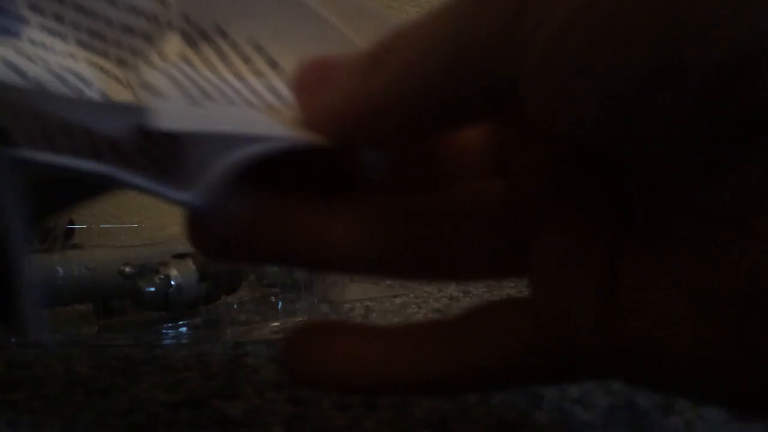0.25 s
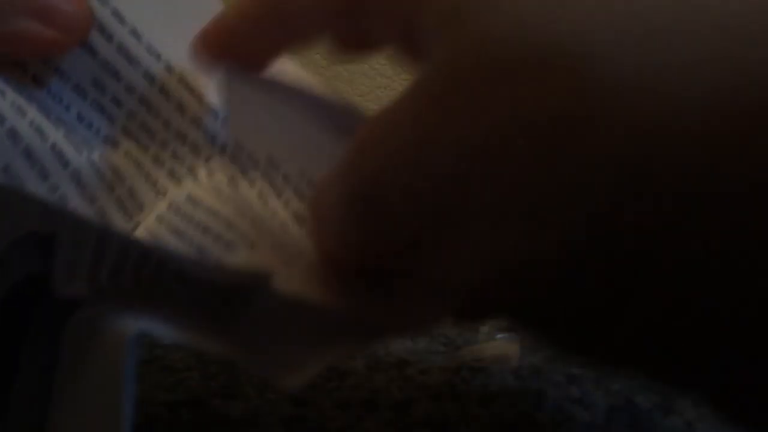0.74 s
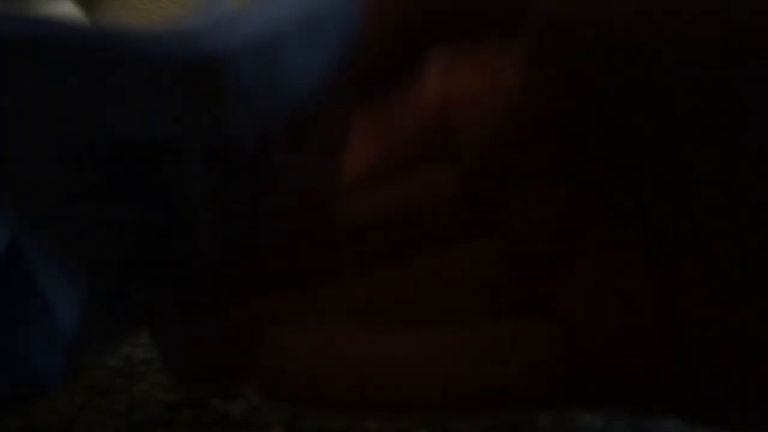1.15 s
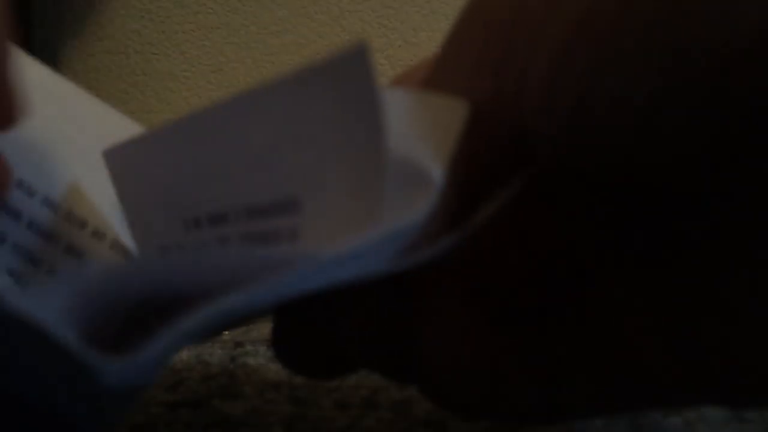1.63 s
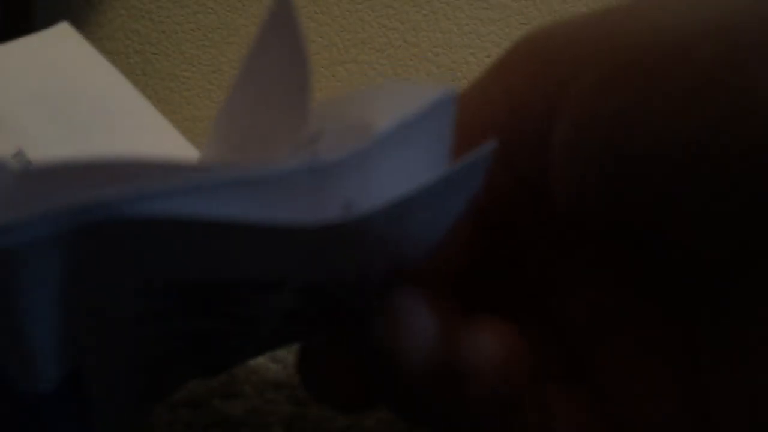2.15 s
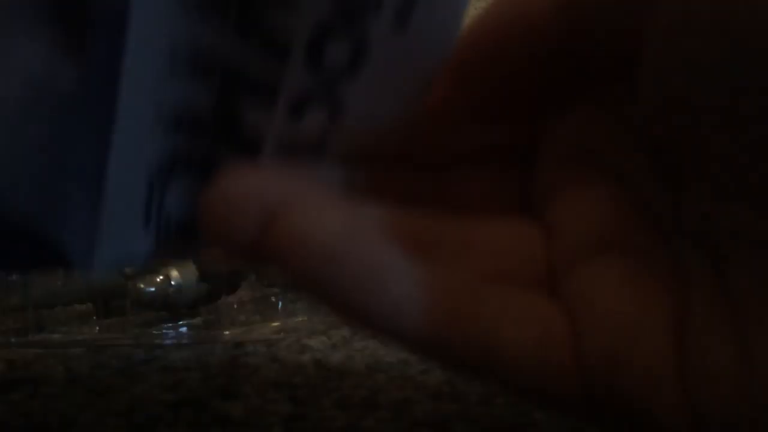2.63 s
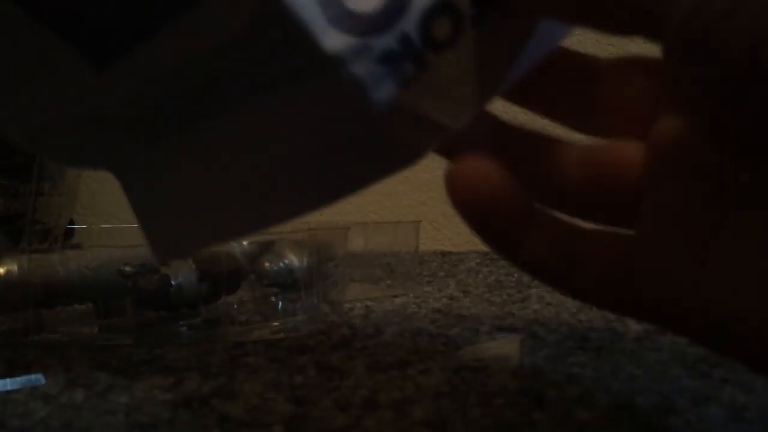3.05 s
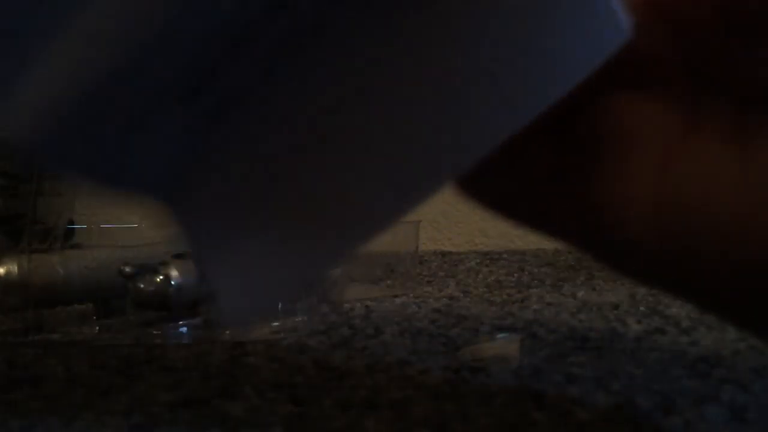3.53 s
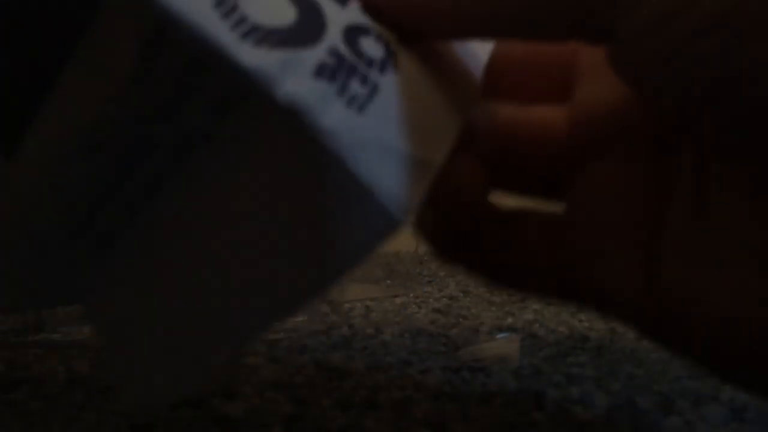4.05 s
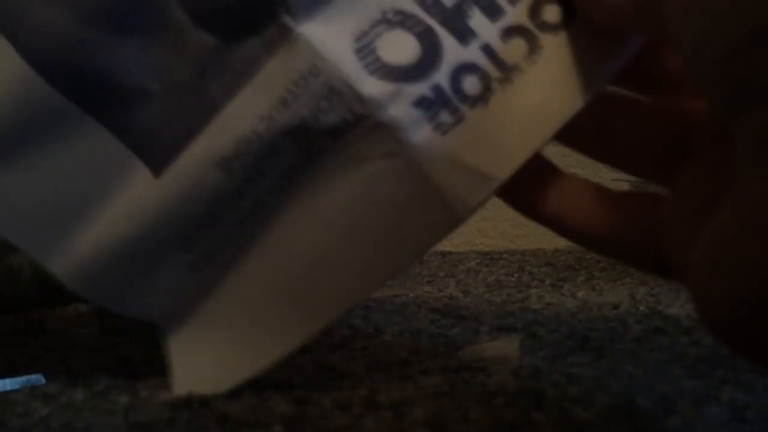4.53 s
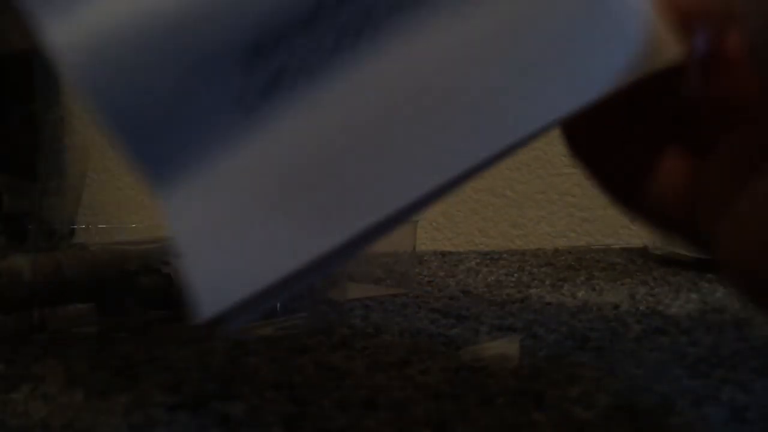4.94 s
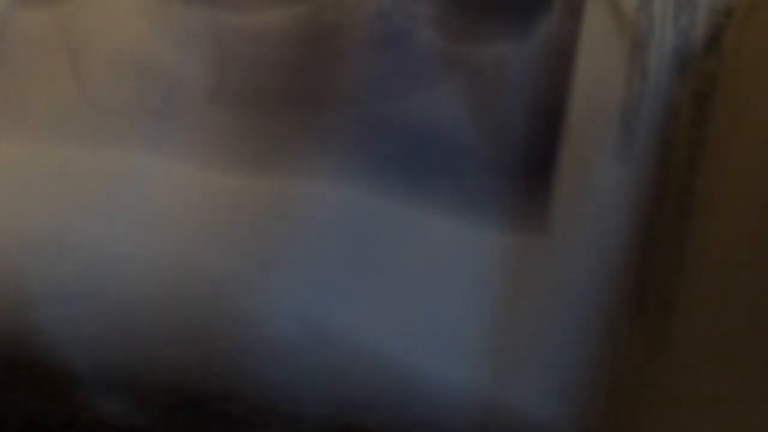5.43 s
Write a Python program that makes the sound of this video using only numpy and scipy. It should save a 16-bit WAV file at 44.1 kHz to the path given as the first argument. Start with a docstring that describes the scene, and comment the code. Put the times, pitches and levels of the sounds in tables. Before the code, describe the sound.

Close, dry rustle of stiff paper sheets sliding and flexing in a small quiet room, punctuated by irregular snaps and low flapping thumps.

```python
"""Paper leaflets opened by hand

Folded leaflets are pulled from a plastic tray and opened out, close to the microphone in a small room.
Friction: sheet slides on sheet, a grainy hiss of catching fibres over the lower crinkle of flexing paper.
Buckling: creases give way in sharp treble cracks, each of which makes the panel around it pop and ring.
Moving air: the sheets push soft, low puffs at the microphone. A short reverberation and a faint room tone
lie beneath.
"""
import sys
import numpy as np
from scipy import signal
from scipy.io import wavfile

SR = 44100
rng = np.random.default_rng(int(sys.argv[2]) if len(sys.argv) > 2 else 0)


def dump(signal):
    """Clip the signal to [-1, 1] and save it as 16-bit WAV at the path in sys.argv[1]."""
    limited = np.clip(np.atleast_2d(signal).T, -1, 1)
    pcm = np.round(limited * 32767).astype(np.int16)
    wavfile.write(sys.argv[1], SR, pcm)


N = 250488
TIME = np.arange(N) / SR   # s


def from_db(db):
    """Level: decibels become an amplitude gain."""
    return 10 ** (np.asarray(db) / 20)


def rms_one(x):
    """Normalisation: scale to unit power."""
    return x / np.sqrt(np.mean(x ** 2) + 1e-20)


def in_time(rows):
    """Interpolation: the columns of a curve, sample by sample."""
    s, *columns = np.transpose(rows)
    return [np.interp(TIME, s, column) for column in columns]


def add(track, s, sound):
    """Superposition: lay a sound into a track at a time."""
    start = int(np.clip(round(s * SR), 0, N - 1))
    track[start:start + len(sound)] += sound[:N - start]


def butter(x, hz, kind, order=2):
    """Filtering: causal low-, high- or band-pass."""
    sections = signal.butter(order, np.clip(hz, 10, .45 * SR), kind, fs=SR, output="sos")
    return signal.sosfilt(sections, x)


def mode_filter(hz, width_hz):
    """Damped oscillation: coefficients of one mode, gain 1 on top."""
    r = np.exp(-np.pi * width_hz / SR)
    zeros = np.array([1, 0, -1]) * (1 - r * r) / 2
    poles = [1, -2 * r * np.cos(2 * np.pi * hz / SR), r * r]
    return zeros, poles


def resonance(x, hz, width_hz):
    """Resonance: one damped mode of fixed pitch."""
    zeros, poles = mode_filter(hz, width_hz)
    return signal.lfilter(zeros, poles, x)


def moving_resonance(x, hz, quality, size=512):
    """Gliding resonance: a mode whose centre moves block by block."""
    out, state = np.zeros(N), np.zeros(2)
    for i in range(0, N, size):
        zeros, poles = mode_filter(hz[i], hz[i] / quality)
        out[i:i + size], state = signal.lfilter(zeros, poles, x[i:i + size], zi=state)
    return out


def bounce(x, lag_s, share):
    """Comb filtering: add the reflection from a surface about a hand's breadth away."""
    i = np.arange(len(x))
    delayed = np.clip(i - np.round(lag_s * SR).astype(int), 0, len(x) - 1)
    return x + share * x[delayed]


def drift(rate_hz):
    """Random modulation: slow chance with spread 1, computed on every 40th sample."""
    r = np.exp(-80 * np.pi * rate_hz / SR)
    noise = rng.standard_normal(N // 40 + 2002)
    slow = signal.lfilter([1], [1, -2 * r, r * r], noise)[2000:]   # past the filter's start
    return np.interp(np.arange(N) / 40, np.arange(len(slow)), rms_one(slow))


def coloured(sources, spectrum, patchy_db, tilt_db=0):
    """Spectral shaping: half-octave bands dealt in turn to two excitations, each wavering; rms 1."""
    points_hz, points_db = np.transpose(spectrum)
    edges = 22 * 2 ** np.arange(0, 9.6, .5)
    out = np.zeros(N)
    for k, (low, high) in enumerate(zip(edges, edges[1:])):
        if high > points_hz[0] and low < points_hz[-1]:
            hz = np.sqrt(low * high)
            level_db = np.interp(np.log(hz), np.log(points_hz), points_db)
            level_db = level_db + tilt_db * np.log2(hz / 6000)   # tilt per octave
            band = butter(sources[k % 2], [low, high], "band")
            out += from_db(level_db + patchy_db * drift(7.8)) * band
    return rms_one(out)


# Spectrum of the quiet room. Each row: frequency in Hz, relative density in dB per Hz.
ROOM_TONE_SPECTRUM = [(25, -8), (60, 66), (150, 13), (400, -17), (1000, -14), (2500, -71), (6000, -73),
                      (15000, -29)]
ROOM_TONE_DB = -61.5


def room_tone():
    """Stationary noise: a steady, faint background of fixed spectrum."""
    noise = rng.standard_normal((2, N))
    return from_db(ROOM_TONE_DB) * coloured(noise, ROOM_TONE_SPECTRUM, patchy_db=0)


ROOM_T60_S, ROOM_DB, WALL_CUT_HZ = 0.23, -22.5, 6200


def room(x):
    """Reverberation: ten feedback delays between near walls, which dull the sound."""
    out = np.zeros(N)
    lags = (rng.uniform(.009, .04, 10) * SR).astype(int)
    for k, lag in enumerate(lags):
        loop, gain = x.copy(), from_db(-60 * lag / SR / ROOM_T60_S)
        for i in range(lag, N, lag):
            loop[i:i + lag] += gain * loop[i - lag:i][:N - i]
        out += (loop - x) * (-1) ** k   # echoes only
    for lag in (53, 127, 211):
        # clutter scatters each echo: all-pass filters
        taps = np.r_[.65, np.zeros(lag - 1), 1]
        out = signal.lfilter(taps, taps[::-1], out)
    return butter(out, WALL_CUT_HZ, "low", order=1) / np.sqrt(10)


# Hollow resonances of the corner between counter and wall.
# Each row: frequency in Hz, width in Hz, added share as a gain.
CORNER_MODES = [(422, 27, 0.13), (990, 54, 0.36), (2230, 8.5, 0.49)]


def corner(paper):
    """Cavity resonance: the corner reinforces a few pitches of the paper."""
    return paper + sum(share * resonance(paper, hz, width_hz) for hz, width_hz, share in CORNER_MODES)


# Strokes of the hand, each sliding one sheet over another.
# Each row: fastest moment in seconds, swell in seconds, fade in seconds, hiss drive in dB,
# flexing drive in dB, stirred air drive in dB, brightness of the hiss in dB per octave.
HAND_STROKES = [(0.028, 0.12, 0.03, -38.5, -35, -38, 0), (0.141, 0.041, 0.031, -38, -43, -63, 7),
                (0.28, 0.044, 0.076, -45, -48.5, -63, 3), (0.371, 0.03, 0.035, -37.5, -38.5, -53, 0),
                (0.437, 0.019, 0.018, -40.5, -39, -40, -1), (0.63, 0.045, 0.024, -42, -41, -61, -3),
                (0.699, 0.053, 0.037, -37.5, -46, -65, 7.5), (0.815, 0.013, .035, -53, -54, -51, 6),
                (0.886, 0.036, 0.028, -41, -44.5, -52, 5.5), (0.979, 0.041, 0.029, -31, -36.5, -47, 3.5),
                (1.119, 0.053, 0.031, -28, -36.5, -52, 1.5), (1.274, 0.07, 0.13, -37, -43.5, -60, 0.5),
                (1.42, .04, .11, -42.5, -49.5, -53.5, 5), (1.577, 0.039, 0.064, -32.5, -33, -41.5, -3),
                (1.661, 0.094, 0.067, -34, -56, -48.5, -2.5), (1.86, 0.074, .025, -44, -46.5, -42.5, 2),
                (1.912, 0.025, 0.042, -33.5, -38.5, -42, -1.5), (2.02, 0.064, .06, -46.5, -48, -48, 0.5),
                (2.125, 0.047, 0.039, -39.5, -56, -39, 0.5), (2.21, 0.053, 0.091, -44, -52, -43, 0.5),
                (2.305, .04, 0.048, -37.5, -41, -42, 1), (2.414, 0.025, 0.038, -43, -45, -39, -6),
                (2.514, 0.059, 0.095, -37, -49, -36, 0), (2.64, 0.015, 0.084, -34, -41.5, -41, -3.5),
                (2.76, 0.038, 0.02, -33.5, -34.5, -53, -4.5), (2.81, .03, 0.067, -53, -51, -50, -2),
                (2.925, 0.021, .045, -40, -43, -41, -2), (3.015, 0.042, 0.035, -34.5, -37.5, -40.5, 0),
                (3.189, 0.032, 0.074, -49, -43, -38, 2), (3.45, 0.091, 0.044, -50.5, -46.5, -51, 3),
                (3.521, .035, 0.094, -33, -44, -44.5, -1), (3.641, 0.038, 0.11, -44, -45, -46, -2.5),
                (3.866, 0.072, 0.095, -39, -44, -48, -2), (4.015, 0.092, 0.079, -41, -42, -45, -1),
                (4.174, 0.038, 0.029, -32, -38, -49, -1), (4.275, 0.057, 0.033, -40, -42.5, -55, -1),
                (4.45, 0.076, 0.12, -38, -39.5, -54, 1), (4.56, 0.06, 0.063, -34, -28, -39, -1),
                (4.61, 0.029, 0.084, -35.5, -30.5, -35.5, 1), (4.8, .06, .05, -49, -59, -56, 6),
                (4.883, 0.031, 0.025, -34.5, -33, -36, 1), (4.98, 0.041, 0.033, -28.5, -28.5, -37, 2.5),
                (5.116, 0.061, 0.061, -34.5, -36.5, -40, 2), (5.292, 0.055, 0.065, -38.5, -39, -41, -0.5),
                (5.429, 0.015, 0.062, -40.5, -41, -37, 1), (5.55, 0.026, 0.027, -31, -28, -27, -3),
                (5.602, 0.014, 0.044, -37.5, -37, -40, 0.5)]
STROKE_SHAPE = 1.94   # 2 is a bell; higher holds longer and stops sooner
HOLD_HISS_DB, HOLD_FLEX_DB, HOLD_AIR_DB = -59.5, -55, -59.5   # the sheets never lie quite still in the hand


def handling():
    """Power summation: strokes drive hiss, flexing and air in dB; the strongest weighs most in brightness."""
    power = from_db([[HOLD_HISS_DB], [HOLD_FLEX_DB], [HOLD_AIR_DB]]) ** 2 * np.ones(N)
    brightness = np.zeros(N)
    for s, swell_s, fade_s, hiss_db, flex_db, air_db, tilt_db in HAND_STROKES:
        away = np.abs(TIME - s) / np.where(TIME < s, swell_s, fade_s)
        effort = np.exp(-np.minimum(away, 4) ** STROKE_SHAPE)
        stroke = (from_db([[hiss_db], [flex_db], [air_db]]) * effort) ** 2
        power += stroke
        brightness += tilt_db * stroke[0]
    hiss_db, flex_db, air_db = 10 * np.log10(power)
    return hiss_db, flex_db, air_db, brightness / power[0]


# Spectrum of the stirred air. Each row: frequency in Hz, relative density in dB per Hz.
AIR_SPECTRUM = [(25, -33), (40, 7.5), (60, -1), (110, 4), (180, 0), (280, -6), (450, -11.5), (800, -20)]


def stirred_air(air_db):
    """Turbulence: low noise that follows the effort of the strokes, 1 dB above their air drive."""
    noise = rng.standard_normal((2, N))
    return from_db(air_db + 1.0) * coloured(noise, AIR_SPECTRUM, patchy_db=1.5)


# A sheet flaps and pushes air.
# Each row: start in seconds, nominal level in dB before the low-pass, swing frequency in Hz.
SHEET_FLAPS = [(0.164, -32.5, 160), (0.193, -32, 140), (0.247, -32, 190), (0.995, -34, 100),
               (1.128, -27, 90), (1.872, -30, 130), (1.926, -24, 170), (2.095, -17.5, 76),
               (2.11, -17.5, 90), (2.465, -24.5, 50), (2.489, -23.5, 60), (2.507, -28, 260),
               (2.53, -28, 60), (2.779, -32, 80), (2.85, -27.5, 101), (2.954, -28, 90), (3.027, -26.5, 100),
               (3.182, -23, 115), (3.226, -21, 125), (4.487, -17, 200), (4.545, -23.5, 110),
               (4.597, -25, 85), (4.648, -31, 60), (4.68, -24.5, 81.5), (4.804, -26, 100),
               (4.922, -23, 101), (5.12, -24, 110), (5.282, -24.5, 115), (5.424, -17, 171),
               (5.56, -20, 280)]


def flaps(push_cycles=0.12, ring_cycles=0.48, swing_share=0.62):
    """Air displacement: one push and pull, then a dying swing; a low swing frequency slows both."""
    out, t = np.zeros(N), np.arange(int(.08 * SR)) / SR
    for s, level_db, swing_hz in SHEET_FLAPS:
        cycles = swing_hz * t   # swings since the flap began
        pushed = cycles / push_cycles
        push = np.e * pushed * (2 - pushed) * np.exp(-pushed)
        swing = swing_share * np.sin(2 * np.pi * cycles) * np.exp(-cycles / ring_cycles)
        add(out, s, -from_db(level_db) * (push + swing))
    return butter(out + 1e-18, 540, "low")


def friction(per_s, smooth):
    """Stick-slip: fibres catch and let go as uneven clicks over a smooth rub, in two uncorrelated versions."""
    born = rng.random(N) < per_s / SR
    return [rms_one(born * rng.standard_normal(N)) + smooth * rng.standard_normal(N) for _ in range(2)]


def crinkles(per_s, low_hz, high_hz, width, count=14):
    """Modal excitation: tiny wrinkles give way at random, each ringing a few spots of the sheet; rms 1."""
    at = rng.integers(0, N, int(per_s * N / SR))
    sizes = from_db(4 * np.minimum(rng.exponential(1, len(at)), 3))
    out = np.zeros(N)
    for hz in np.geomspace(low_hz, high_hz, count):
        clicks = np.full(N, 1e-18)
        heard = rng.random(len(at)) < .4   # each wrinkle reaches this spot or not
        clicks[at] = sizes * rng.standard_normal(len(at)) * heard
        out += resonance(clicks, hz, width * hz) / np.sqrt(hz)
    return rms_one(out)


# Spectrum of the rubbing fibres. Each row: frequency in Hz, relative density in dB per Hz.
HISS_SPECTRUM = [(900, -2.5), (1600, -3.5), (2400, -3), (3600, 1), (5400, 0.5), (7500, 2.5), (9500, -1),
                 (12000, -4.5), (15500, -5.5)]
# Spectrum of the flexing sheets. Each row: frequency in Hz, relative density in dB per Hz.
FLEX_SPECTRUM = [(180, -7.5), (330, 3), (520, -0.5), (750, 3), (1050, 5.5), (1500, -0.5), (2100, -11.5),
                 (3500, -21)]
# Resonance of the gap between the sliding sheets. Each row: time in seconds, frequency in Hz.
GAP_RESONANCE = [(0.0, 5400), (0.14, 6600), (0.55, 5530), (0.69, 7040), (0.9, 4960), (1.3, 5500),
                 (1.45, 8450), (1.65, 4494), (2.18, 4900), (2.42, 2720), (2.7, 2450), (3.0, 7300),
                 (3.55, 6450), (3.85, 6000), (4.08, 3400), (4.35, 5800), (4.58, 3180), (4.95, 5400),
                 (5.6, 4000)]
# The leaflet rings lower as it is opened out.
# Each row: time in seconds, main resonance of the flexing sheet in Hz.
SHEET_RESONANCE = [(0.0, 1520), (0.9, 1390), (1.6, 1130), (2.7, 930), (4.2, 680), (5.6, 524)]
PUCKER_WIDTH = .14   # of each crinkle's pitch


def sliding(hiss_db, flex_db, tilt_db, gap_gain=0.49, gap_quality=3.4, tick_db=-6, pucker_db=-2):
    """Friction: faster sliding trips more fibres; hiss rings in the gap while the sheets flex and crinkle."""
    (gap_hz,), (sheet_hz,) = in_time(GAP_RESONANCE), in_time(SHEET_RESONANCE)
    speed = from_db(.5 * (hiss_db + 40))   # 1 where the hiss drive is -40 dB
    hiss = coloured(friction(2200 * speed, smooth=0.99), HISS_SPECTRUM, patchy_db=1.2, tilt_db=tilt_db)
    hiss = hiss + from_db(tick_db) * crinkles(160, 1755, 9660, width=0.048)
    hiss = hiss + gap_gain * moving_resonance(hiss, np.clip(gap_hz, 1000, 12000), gap_quality)
    flex = coloured(friction(350 * speed, smooth=0.92), FLEX_SPECTRUM, patchy_db=2.5)
    flex = flex + from_db(pucker_db) * crinkles(60, 490, 1630, PUCKER_WIDTH)
    flex = flex + 0.5 * moving_resonance(flex, sheet_hz, quality=6.7)
    # the sheets move above the counter, so their reflection drifts
    lag_s = 0.00065 * np.exp(0.34 * drift(1.2))
    hiss, flex = [rms_one(bounce(layer, lag_s, share=0.44)) for layer in (hiss, flex)]
    stick_slip_db = 1.6 * drift(45)
    return from_db(stick_slip_db - 1.5) * (from_db(hiss_db) * hiss + from_db(flex_db) * flex)


def burst(t, decay_s, rise_share, grain_db):
    """Fracture cascade: tiny breaks along a crease, quick to start and dying away."""
    envelope = (1 - np.exp(-t / (rise_share * decay_s))) * np.exp(-t / decay_s)
    return envelope * rng.choice([-1, 1], len(t)) * from_db(grain_db * rng.standard_normal(len(t)))


def straining(crack_hz, lead_db=-17, lead_s=0.0032):
    """Precursory fracture: the first fibres tick in the moments before a crease gives way."""
    t = np.arange(int(.008 * SR)) / SR
    fibres = rng.standard_normal(len(t)) * from_db(5.0 * rng.standard_normal(len(t)))
    ticks = rms_one(resonance(fibres, crack_hz, .8 * crack_hz))
    return from_db(lead_db) * np.exp(-t[::-1] / lead_s) * ticks


def overtones(kick, panel_hz, width=0.059, count=4):
    """Inharmonic modes: each panel's own shape gives a few sharper modes scattered about its pitch; rms 1."""
    modes_hz = panel_hz * 2 ** rng.uniform(-1.3, 1.4, count)
    return rms_one(sum((-1) ** k * rms_one(resonance(kick, hz, width * hz)) for k, hz in enumerate(modes_hz)))


# Lesser creases give way by chance, about as loud as the handling of the moment.
SMALL_SNAPS_PER_S, SMALL_DECAY_S = 20, .0013
SMALL_CRACK_DB, SMALL_CRACK_HZ = -1.5, 4660   # level relative to the hiss drive
SMALL_POP_DB, SMALL_PANEL_HZ = -1, 1156   # level relative to the flexing drive


def small_snaps(hiss_db, flex_db, spread_db=-0.5, pitch_spread=0.29, decay_spread=0.55):
    """Random buckling: lesser creases drawn by chance, as rows like those of the large ones."""
    count = int(SMALL_SNAPS_PER_S * N / SR)
    at = rng.integers(0, N, count)
    chances = np.clip(rng.standard_normal((count, 5)), -2, 2)
    rows = []
    for i, (slow, crack, sharp, pop, stiff) in zip(at, chances):
        decay_s = SMALL_DECAY_S * np.exp(decay_spread * slow)
        crack_db = hiss_db[i] + SMALL_CRACK_DB + spread_db * crack
        crack_hz = SMALL_CRACK_HZ * np.exp(pitch_spread * sharp)
        pop_db = flex_db[i] + SMALL_POP_DB + spread_db * pop
        panel_hz = SMALL_PANEL_HZ * np.exp(pitch_spread * stiff)
        rows.append((i / SR, decay_s, crack_db, crack_hz, pop_db, panel_hz))
    return rows


# Creases that buckle, with levels taken over 5 ms before the band-passes.
# Each row: start in seconds, crackle decay in seconds (held to 0.3 ms or more), crack level in dB,
# crack centre in Hz, panel pop level in dB, panel pitch in Hz.
BUCKLING_CREASES = [(0.0085, 0.0028, -14, 4930, -16, 1284), (0.042, 0.0055, -29, 6900, -33, 1530),
                    (0.1927, 0.0054, -34.5, 7960, -41, 840), (0.2458, 0.0033, -42, 8040, -36, 389),
                    (0.3245, 0.0013, -43, 5300, -38.5, 910), (0.3585, 0.004, -20, 5950, -28, 740),
                    (0.3625, 0.002, -22, 6300, -26.5, 740), (0.4997, 0.0014, -71, 4400, -39, 980),
                    (0.5954, 0.003, -49, 3500, -29, 720), (0.778, 0.004, -45.5, 5030, -43.5, 1610),
                    (0.835, .0062, -41.5, 6100, -37.5, 1140), (0.8774, .0037, -33, 7050, -31.5, 970),
                    (1.0476, 0.0046, -44, 6600, -36, 975), (1.1067, 0.0016, -16.5, 5800, -33, 1690),
                    (1.127, .0018, -15, 3770, -21.5, 708), (1.223, 0.0061, -29, 6400, -41, 1610),
                    (1.287, 0.0015, -33, 5600, -38, 1370), (1.2985, 0.00074, -20, 6430, -40, 1320),
                    (1.3153, 0.0011, -25, 5500, -57, 1200), (1.5575, 0.0012, -40, 3000, -20, 1060),
                    (1.6313, 0.002, -42, 4500, -22, 1280), (1.6422, 0.00027, -17, 6900, -17, 1730),
                    (1.647, 0.0013, -15.5, 3800, -16.5, 664), (1.7447, 0.0018, -52, 4700, -34.5, 1080),
                    (1.8402, 0.0052, -31.5, 8000, -34, 333), (2.1121, 0.0027, -27.5, 4970, -30, 1050),
                    (2.129, .0023, -37, 4960, -46, 990), (2.3251, 0.00297, -36, 6400, -28.5, 372),
                    (2.3405, 0.0012, -49, 5500, -31.5, 690), (2.3937, 0.0075, -33.5, 4000, -35, 300),
                    (2.5052, 0.0044, -31, 4800, -34.5, 870), (2.5332, 0.0012, -32.5, 3950, -27.5, 990),
                    (2.6232, 0.0052, -25, 3900, -28.5, 1020), (2.6835, 0.0047, -32, 3360, -27.5, 417),
                    (2.757, 0.0016, -21, 5170, -28, 1010), (2.7664, .0014, -16, 7200, -22, 980),
                    (2.772, 0.0015, -16, 7600, -20.5, 398), (2.8941, 0.00095, -18.5, 3440, -16.5, 852),
                    (2.9536, 0.00071, -29.5, 4530, -21, 668), (3.0138, 0.0016, -24, 8000, -29, 1510),
                    (3.0401, 0.0035, -32, 4040, -27, 1270), (3.182, 0.0012, -50, 4700, -31.5, 1090),
                    (3.197, 0.0014, -45, 2800, -29.5, 750), (3.2222, 0.00053, -29, 4900, -21.5, 1050),
                    (3.264, 0.002, -62, 4500, -36, 940), (3.424, 0.00094, -33.5, 4700, -32.5, 1410),
                    (3.4423, 0.0017, -51, 4200, -31, 970), (3.4965, 0.0025, -12, 5960, -17.5, 1850),
                    (3.5121, 0.0025, -27, 3300, -16.5, 1320), (3.5505, .0014, -11.5, 5240, -14.5, 430),
                    (3.6314, 0.0042, -34, 6040, -28.5, 773), (3.8986, 0.0042, -27, 5140, -25.5, 1585),
                    (4.1834, 0.0031, -26, 4900, -39, 1250), (4.4, 0.0007, -33, 3840, -21.5, 1560),
                    (4.4877, 0.00072, -16, 6600, -13, 994), (4.489, .0036, -13, 4550, -11.5, 1103),
                    (4.4989, 0.00059, -18, 5440, -24.5, 730), (4.5434, 0.0068, -19.5, 3100, -17.5, 875),
                    (4.5922, 0.0037, -25.5, 3700, -17.5, 1073), (4.5752, 0.00074, -35, 3500, -29, 1690),
                    (4.6453, 0.0032, -50, 4300, -34, 1140), (4.6827, 0.0017, -28.5, 3980, -20.5, 1010),
                    (4.7309, 0.0044, -32, 4000, -21, 1050), (4.799, .001, -24, 4420, -16.5, 997),
                    (4.879, 0.0026, -25.5, 4300, -21, 710), (4.9217, 0.0021, -28.5, 3440, -23, 1050),
                    (4.951, 0.0021, -29, 6000, -25, 1610), (4.966, 0.0013, -19.5, 6510, -40, 1530),
                    (4.9735, 0.0028, -50, 5100, -18.5, 1730), (5.059, 0.0043, -36.5, 6000, -30, 840),
                    (5.101, 0.0081, -32, 5240, -27, 680), (5.218, 0.0069, -27.5, 6600, -36, 1320),
                    (5.2663, 0.0016, -25.5, 3930, -23.5, 1324), (5.3174, 0.0023, -39.5, 3750, -27.5, 730),
                    (5.4198, 0.0025, -20.5, 3740, -21, 930), (5.5165, .0018, -31.5, 4240, -36, 1000),
                    (5.5339, 0.0016, -18.5, 3500, -18.5, 1820), (5.5437, 0.00082, -44, 3100, -16, 1710),
                    (5.5622, 0.00095, -24, 4530, -22, 2040), (5.5805, 0.00076, -14, 5900, -22, 1850)]


def snaps(lesser_creases, crack_width=0.67, panel_width=0.16, upper_db=-7, broad_db=-7, tail_db=-28,
          tail_s=0.012, main_break=4.88, flip=0.64, flip_s=0.00026):
    """Buckling: each crease cracks in the treble and flips its panel, which rings for a few cycles."""
    cracks, pops = np.full((2, N), 1e-18)
    t = np.arange(int(.04 * SR)) / SR
    to_level = np.sqrt(.005 * SR / len(t))   # refers the level to 5 ms
    for s, decay_s, crack_db, crack_hz, pop_db, panel_hz in list(BUCKLING_CREASES) + lesser_creases:
        decay_s = max(decay_s, .0003)
        # bending waves run on through the sheet after the crease has given way
        tail = from_db(tail_db) * np.exp(-t / tail_s) * rng.standard_normal(len(t))
        fractures = burst(t, decay_s, rise_share=0.14, grain_db=9.5) + tail
        fractures[int(.4 * decay_s * SR)] += main_break
        reflected = bounce(fractures, rng.uniform(.0004, .0013), share=0.42)
        crack = resonance(reflected, crack_hz, crack_width * crack_hz)
        # a quick crease flips the panel in one go; a slow one shakes it
        pulse = rms_one(np.exp(-((t - .5 * decay_s) / flip_s) ** 2))
        one_go = flip * np.exp(-decay_s / 0.0045) * pulse
        kick = one_go + rms_one(burst(t, decay_s, rise_share=0.53, grain_db=5.5) + tail)
        # main mode, upper mode, broad body and scattered overtones
        panel = rms_one(resonance(kick, panel_hz, panel_width * panel_hz))
        panel -= from_db(upper_db) * rms_one(resonance(kick, 2.273 * panel_hz, 0.25 * panel_hz))
        panel += from_db(broad_db) * rms_one(resonance(kick, 460, 1130))
        panel += from_db(-6.0) * overtones(kick, panel_hz)
        lead = straining(crack_hz)
        add(cracks, s - len(lead) / SR, from_db(crack_db) * lead)
        add(cracks, s, to_level * from_db(crack_db) * rms_one(crack))
        add(pops, s, to_level * from_db(pop_db) * rms_one(panel))
    return butter(cracks, [1000, 13800], "band") + butter(pops, [140, 3000], "band")


def scene():
    """Superposition: paper close by with its reverberation, the air it moves, and the quiet room."""
    hiss_db, flex_db, air_db, tilt_db = handling()
    air = stirred_air(air_db) + flaps()
    paper = sliding(hiss_db, flex_db, tilt_db) + snaps(small_snaps(hiss_db, flex_db))
    paper = corner(paper)
    return (paper + from_db(ROOM_DB) * room(paper) + air + room_tone())[None]


# Ripples of the microphone port. Each row: frequency in Hz, width in Hz, added share as a gain.
PORT_MODES = [(3270, 400, 0.24), (5540, 81, 0.59), (9230, 86, 0.078)]
CUTOFF_HZ = 15550


def record(dry):
    """Transduction: the port colours the treble, deep bass is thinned, peaks are rounded, the top is cut."""
    picked_up = dry + sum(share * resonance(dry, hz, width_hz) for hz, width_hz, share in PORT_MODES)
    rounded = 1.28 * np.tanh(butter(picked_up, 54, "high") / 1.294)
    return signal.sosfilt(signal.ellip(10, .2, 75, CUTOFF_HZ, fs=SR, output="sos"), rounded)


dry = scene()
out = record(dry)
dump(out)
```